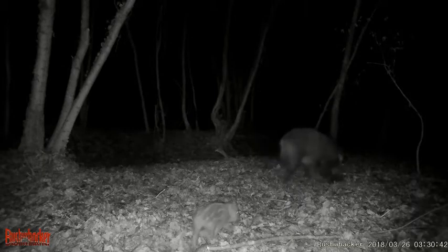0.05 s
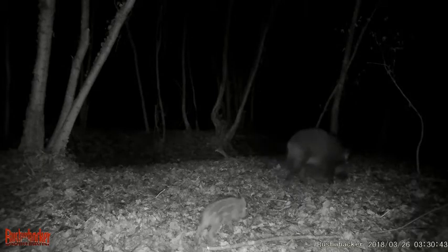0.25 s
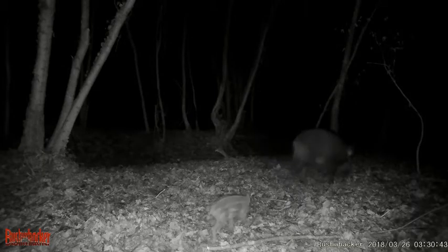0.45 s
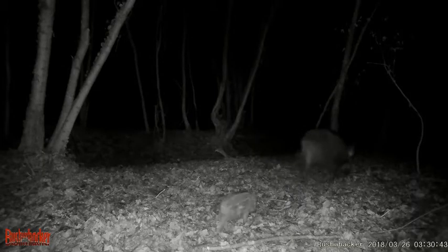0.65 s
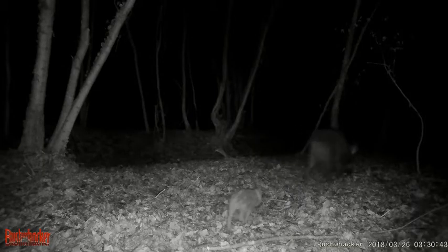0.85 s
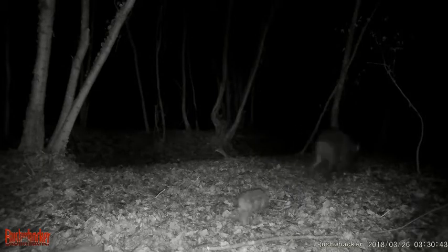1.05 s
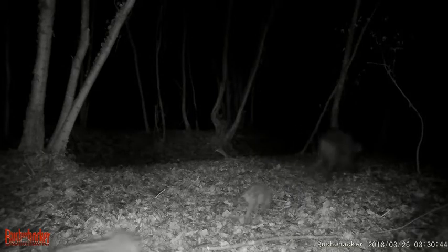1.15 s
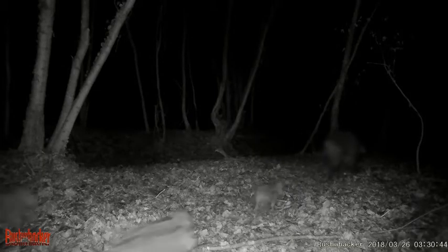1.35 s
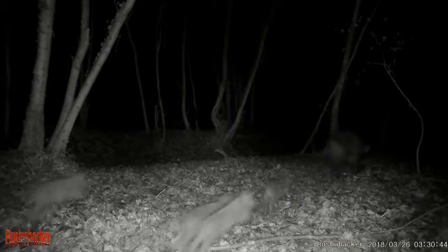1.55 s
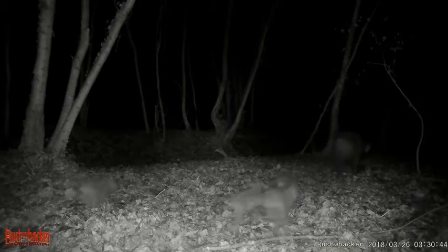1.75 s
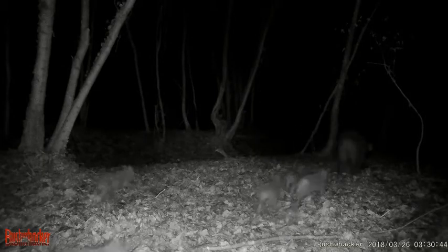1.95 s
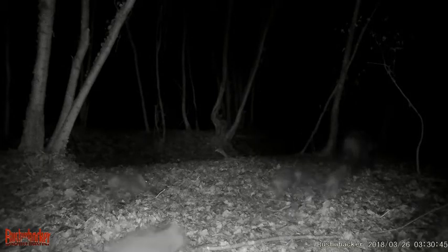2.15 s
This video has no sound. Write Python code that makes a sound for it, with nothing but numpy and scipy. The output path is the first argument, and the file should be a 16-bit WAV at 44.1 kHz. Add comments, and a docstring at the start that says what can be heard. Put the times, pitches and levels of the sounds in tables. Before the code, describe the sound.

Wild boar and piglets trot through dry leaves in a quiet night forest. Light rustling with faint squeaks and soft grunts grows into louder crunching and sharp twig snaps close to the microphone, then eases off.

```python
"""Wild boar and piglets trot through dry leaves on a forest floor at night, coming close to the
mono microphone of a small camera. Each step crushes a patch of leaves into many tiny cracks; hooves
click, twigs crack, and the herd keeps the litter stirring. The sow grunts softly, a piglet squeaks
thinly, and the trunks answer faintly. At moments the rustle turns glassy."""
import sys
import numpy as np
from scipy import signal
from scipy.fft import rfft, irfft, next_fast_len
from scipy.io import wavfile
from scipy.ndimage import uniform_filter1d, map_coordinates

SR = 44100
rng = np.random.default_rng(int(sys.argv[2]) if len(sys.argv) > 2 else 0)


def transcribe(signal):
    """Save signal, clipped to [-1, 1], as a 16-bit WAV file at the path in sys.argv[1]."""
    frames = np.atleast_2d(signal).T
    limited = np.clip(frames, -1, 1)
    pcm = np.round(limited * 32767).astype(np.int16)
    wavfile.write(sys.argv[1], SR, pcm)


N = 97020


def amp(db):
    """Decibels to gain."""
    return 10 ** (np.asarray(db) / 20)


def unit(x):
    """Scale to rms 1."""
    return x / np.sqrt(np.mean(x ** 2) + 1e-20)


def clock():
    """Time of each sample in seconds."""
    return np.arange(N) / SR


def wobble(rate):
    """A smooth random curve, rate knots a second."""
    return map_coordinates(rng.standard_normal(8192), [clock() * rate], mode="wrap")


def colour(x, points, size=2048):
    """Minimum-phase filter of unit energy through (f/Hz, level/dB) points."""
    hz, db = np.transpose(points)
    grid = np.fft.rfftfreq(size, 1 / SR)
    gain = amp(np.interp(np.log(grid + 1), np.log(hz), db))
    cepstrum = irfft(np.log(gain))
    cepstrum[1:size // 2] *= 2
    cepstrum[size // 2 + 1:] = 0
    impulse = irfft(np.exp(rfft(cepstrum)))
    return signal.fftconvolve(x, impulse / np.linalg.norm(impulse))[:N]


def night_air():
    """The quiet bed of the forest: a steady low rush with faint hiss."""
    # background spectrum: f/Hz, level/dB
    spectrum = [(20, 5), (60, 2), (150, 1.5), (350, -2.5), (800, -7.5), (2000, -16), (10000, -14.5),
                (16000, -12)]
    return amp(-60.5) * unit(colour(rng.standard_normal(N), spectrum))


def crackle(per_s, spread_db, life_s, rub):
    """Envelope of many tiny cracks of uneven size over smooth rubbing."""
    sizes = amp(spread_db * np.minimum(rng.standard_normal(N), 2))
    cracks = (rng.random(N) < per_s / SR) * sizes ** 2
    power = signal.lfilter([1], [1, -np.exp(-2 / (life_s * SR))], cracks)
    return np.sqrt(power / power.mean() + rub)


def leaf_noise(cracks, spectrum, patch_db=1.92, size=256):
    """Crackling noise; every leaf has its own colour, so gain varies in patches of time and frequency."""
    frames = signal.stft(cracks * rng.standard_normal(N), nperseg=size)[2]
    patches = uniform_filter1d(rng.standard_normal(frames.shape), size=6, axis=0)
    patches = uniform_filter1d(patches, size=4, axis=1)
    mottled = signal.istft(frames * amp(patch_db * unit(patches)), nperseg=size)[1][:N]
    return unit(colour(mottled, spectrum))


def leaves():
    """Steps swell, hold and die away in the litter; the same cracks sound in treble, crunch and body."""
    # hoof steps: t/s, time pressed down/s, crisp level/dB, crunch level/dB, body level/dB
    steps = [(0.124, 0.051, -55, -59, -66.5), (0.21, 0.033, -41, -50, -55),
             (0.419, 0.0078, -38.5, -42, -52), (0.491, 0.048, -46.5, -49, -58.5),
             (0.642, 0.0036, -37, -40, -56), (0.674, 0.032, -37.5, -40.5, -48.5),
             (0.756, 0.048, -41.5, -48, -56), (0.837, 0.023, -37, -39.5, -50.5),
             (0.945, 0.067, -41.5, -43.5, -55), (1.017, 0.0032, -42, -49, -54),
             (1.068, 0.028, -34, -32.5, -46), (1.148, 0.074, -31.5, -30.5, -39.5),
             (1.254, 0.054, -39.5, -43, -63), (1.321, 0.012, -32, -40, -43), (1.359, 0.057, -44, -39, -46),
             (1.43, 0.013, -30, -34, -43.5), (1.5, 0.004, -31.5, -30, -38.5),
             (1.555, 0.048, -35, -36.5, -48.5), (1.693, 0.066, -42, -47, -50.5),
             (1.798, 0.05, -38, -44.5, -47.5), (1.869, 0.013, -48, -47.5, -52),
             (1.926, 0.0051, -39, -42.5, -50), (2.028, 0.027, -46.5, -51.5, -56),
             (2.104, 0.044, -43.5, -45.5, -52)]
    # litter kept stirring by the herd: t/s, level/dB
    stirring = [(0, -53.5), (.07, -65.5), (.45, -51), (.9, -48.5), (1.25, -34), (1.6, -41.5), (2.2, -53)]
    # crisp treble of steps farther off: f/Hz, level/dB
    far_spectrum = [(3000, -58), (6000, -31), (8000, -14), (9400, 6), (11000, 3.5), (12200, -2),
                    (13200, -3.5), (15000, -19), (16000, -35)]
    # crisp treble of steps close to the microphone: f/Hz, level/dB
    near_spectrum = [(3000, -50), (5800, -12), (7200, -1), (10000, 0.2), (12000, 0), (13500, -3),
                     (15200, -5), (16200, -16)]
    # close steps' part of the treble power: t/s, share/0-1
    near_share = [(0, 0.063), (1.0, 0.056), (1.15, 0.38), (1.55, 0.4), (1.75, 0.94), (2.2, 1)]
    # midrange crunch of a step: f/Hz, level/dB
    crunch_spectrum = [(900, -46.5), (1800, -6.5), (2600, -4.5), (3800, 1.5), (5500, 1.5), (7000, -1),
                       (9000, 0), (14000, -42)]
    # hollow body of a step: f/Hz, level/dB
    body_spectrum = [(40, -23.5), (130, -10), (300, -7.5), (600, -5.5), (1000, -6), (1550, 0), (2100, 1),
                     (3000, -0.5), (6000, -40)]
    attack_db_per_s, release_db_per_s = 651, 298
    t = clock()
    stir_db = np.interp(t, *np.transpose(stirring))
    power = amp(stir_db + [[-4.5], [-5.5], [-13.5]]) ** 2  # rows: crisp, crunch, body
    for start, hold, *levels in steps:
        rise_db = -attack_db_per_s * np.maximum(start - t, 0)
        fall_db = -release_db_per_s * np.maximum(t - start - hold, 0)
        power += amp(np.array(levels)[:, None] + rise_db + fall_db) ** 2
    crisp, crunch, body = np.sqrt(power)
    cracks = crackle(per_s=1300, spread_db=4.5, life_s=0.00067, rub=1.0)
    near = np.interp(t, *np.transpose(near_share))
    treble = np.sqrt(1 - near) * leaf_noise(cracks, far_spectrum)
    treble += np.sqrt(near) * leaf_noise(cracks, near_spectrum)
    return (amp(-0.5) * crisp * treble
            + crunch * leaf_noise(cracks, crunch_spectrum)
            + body * leaf_noise(cracks, body_spectrum))


def throat(pitch, partials, jitter, shimmer_db, rate):
    """A harmonic voice with unsteady pitch and strength."""
    phase = 2 * np.pi * np.cumsum(pitch * (1 + jitter * wobble(rate))) / SR
    voice = sum(amp(db) * np.sin(k * phase) for k, db in partials)
    return unit(voice * amp(shimmer_db * wobble(rate)))


def sow():
    """Soft, rough, closed-mouth grunts that rise slightly."""
    # grunts: t/s, length/s, level/dB, first f/Hz, last f/Hz
    grunts = [(0.16, 0.025, -63, 280, 320), (0.61, 0.036, -59.5, 334, 403), (0.826, .05, -61.5, 319.6, 344),
              (.906, 0.1164, -56.5, 281.6, 322), (1.84, .08, -66, 249.5, 277)]
    # harmonics of a grunt: multiple, level/dB
    partials = [(1, -9), (2, -24)]
    out = np.zeros(N)
    for start, length, db, first_hz, last_hz in grunts:
        progress = np.clip((clock() - start) / length, 0, 1)
        pitch = first_hz + (last_hz - first_hz) * progress
        swell = np.minimum(10 * progress * (1 - progress), 1)
        out += amp(db) * swell * throat(pitch, partials, jitter=0.08, shimmer_db=2, rate=220)
    return out


def trunks(x, t60_s=0.076):
    """The surrounding trunks scatter sound back as a short tail."""
    t = np.arange(SR // 2) / SR
    tail = rng.standard_normal(len(t)) * amp(-60 * t / t60_s)
    return signal.fftconvolve(x, tail / np.linalg.norm(tail))[:N]


def piglet():
    """Short thin squeaks, each one bending through three pitches."""
    # squeaks: t/s, length/s, level/dB, tilt/dB per harmonic, first, middle and last f/Hz
    squeaks = [(0.193, .052, -48.5, 1, 1172, 1042, 1520), (0.248, 0.052, -56.5, 0, 990, 1028, 1030),
               (0.296, .022, -54, -2, 1477, 1400, 1110), (0.307, .017, -50.5, 3, 1600, 1483, 1290)]
    # harmonics of a squeak before the tilt: multiple, level/dB
    partials = [(1, -16.5), (2, -1), (3, -8), (4, -6), (5, -3.5), (6, -12), (7, -9)]
    out = np.zeros(N)
    for start, length, db, tilt, *pitches in squeaks:
        progress = np.clip((clock() - start) / length, 0, 1)
        pitch = np.polyval(np.polyfit([0, .5, 1], pitches, 2), progress)
        tilted = [(k, level + tilt * k) for k, level in partials]
        swell = np.sqrt(4 * progress * (1 - progress))
        out += amp(db) * swell * throat(pitch, tilted, jitter=0.0157, shimmer_db=-1, rate=850)
    return out


def hooves_and_twigs(snap_t60_s=0.0037, tail_db=-23.5, tail_t60_s=0.067):
    """A hoof strikes or a twig cracks: a millisecond burst, followed by a faint noisy tail."""
    # sharp snaps and clicks of hoof strikes and cracking twigs: t/s, level/dB, low part re bright/dB
    snaps = [(.1985, -45, -8), (0.4242, -34, -6), (0.4677, -26.5, -4), (0.5759, -29, -0.5),
             (0.634, -24.5, -1.5), (0.7054, -22.5, 4), (0.7135, -27, -18), (0.757, -36, -14),
             (0.836, -31, -8), (0.943, -23, -6), (1.18, -21, 2), (1.2238, -11, -7), (1.2549, -6, -8.5),
             (1.3116, 1, -12.5), (1.3668, -30, -3), (1.406, -19, 5), (1.443, -15, -15),
             (1.5908, -21.5, -1.5), (1.671, -23.5, -5), (1.8842, -31.5, -10)]
    # bright part of a snap: f/Hz, level/dB
    bright_spectrum = [(300, -51), (2000, -19), (5000, -2), (7000, 8), (9000, 5.5), (11500, 7), (15000, 1),
                       (16500, -16)]
    # low part of a snap: f/Hz, level/dB
    low_spectrum = [(80, -33), (500, -13), (1200, -10.5), (2000, -0.5), (4000, 5.5), (7000, -25),
                    (14000, -51)]
    bright, low = np.zeros((2, N + SR))
    t = np.arange(SR // 10) / SR
    decay = amp(-60 * t / snap_t60_s) + amp(tail_db - 60 * t / tail_t60_s)
    for start, db, low_db in snaps:
        burst = rng.standard_normal((2, len(t))) * decay
        burst *= np.linalg.norm(decay) / np.linalg.norm(burst, axis=1, keepdims=True)
        bright[round(start * SR):][:len(t)] += amp(db) * burst[0]
        low[round(start * SR):][:len(t)] += amp(db + low_db) * burst[1]
    return amp(-7) * (colour(bright[:N], bright_spectrum) + colour(low[:N], low_spectrum))


def glassy(rustle):
    """Now and then the rustle dips and a cluster of narrow, raspy tones rings in its place."""
    # glassy rings: peak t/s, level/dB, rise and fade/dB per s, rasp/rad, four tones f/Hz
    rings = [(0.381, -52, 620, .3, 4330, 5470, 8500, 10300),
             (0.66, -37, 615, 0.75, 2376, 4340, 5400, 10400),
             (0.814, -42.5, 620, 0.46, 2790, 4900, 10300, 11800),
             (1.023, -23.5, 990, 0.94, 2593, 4170, 9830, 10740),
             (1.089, -28, 750, 0.43, 2830, 3660, 4780, 10800),
             (1.131, -34, 620, 0.54, 4300, 5000, 5640, 11560),
             (1.43, -31.5, 620, 0.28, 1880, 2846, 6600, 11500),
             (1.537, -36.5, 620, 0.5, 1670, 2860, 3830, 6050),
             (1.985, -48, 620, 0.27, 5340, 6900, 8650, 10700)]
    dip_db, dip_half_width_s = -11, 0.0079
    tilt_db_per_octave, rasp_cycles = 2.5, 14
    sparkle_low_hz, sparkle_high_hz = 8600, 13000
    t, tones = clock(), np.zeros(N)
    for peak, db, fade, rasp, *pitches in rings:
        rustle = rustle * amp(dip_db * np.exp(-((t - peak) / dip_half_width_s) ** 4))
        levels = tilt_db_per_octave * np.log2(np.divide(pitches, pitches[0]))
        levels[1] += 1.5  # the second tone stands out
        chord = sum(amp(level) * np.sin(2 * np.pi * hz * t + rasp * wobble(hz / rasp_cycles))
                    for level, hz in zip(levels, pitches))
        spread = (np.arange(4) + rng.random(4)) / 4  # a chance tone in each quarter of the sparkle band
        sparkle_hz = sparkle_low_hz + (sparkle_high_hz - sparkle_low_hz) * spread
        chord += sum(np.sin(2 * np.pi * hz * t) for hz in sparkle_hz)
        tones += amp(db + 0.5 - fade * np.abs(t - peak)) * unit(chord)
    return rustle + tones


def scene():
    """The herd among the trees, heard from one spot; only snaps and calls come back off the trunks."""
    snaps_and_calls = hooves_and_twigs() + piglet() + sow()
    rustle = glassy(night_air() + leaves())
    return (rustle + snaps_and_calls + amp(-11) * trunks(snaps_and_calls))[None]


def record(dry):
    """The small camera keeps nothing above its band limit."""
    top_hz = 16200
    size = next_fast_len(N + SR // 2)
    passband = np.fft.rfftfreq(size, 1 / SR) < top_hz
    return irfft(rfft(dry, size) * passband, size)[..., :N]


dry = scene()
out = record(dry)
transcribe(out)
```